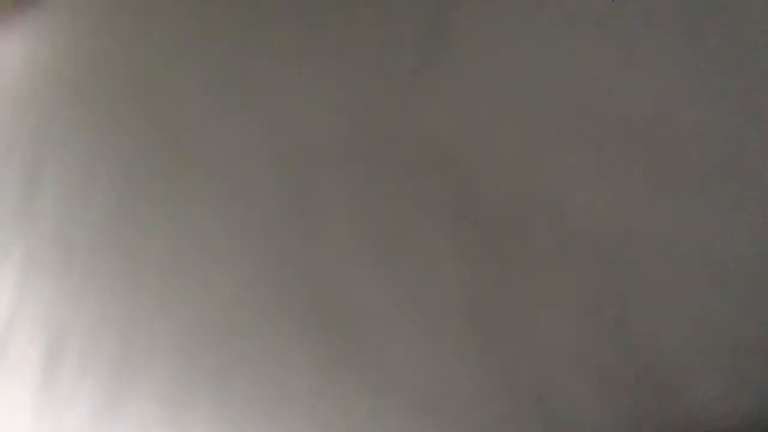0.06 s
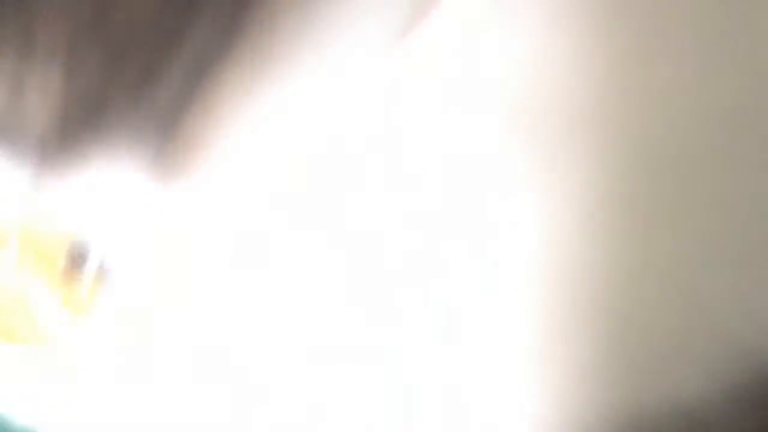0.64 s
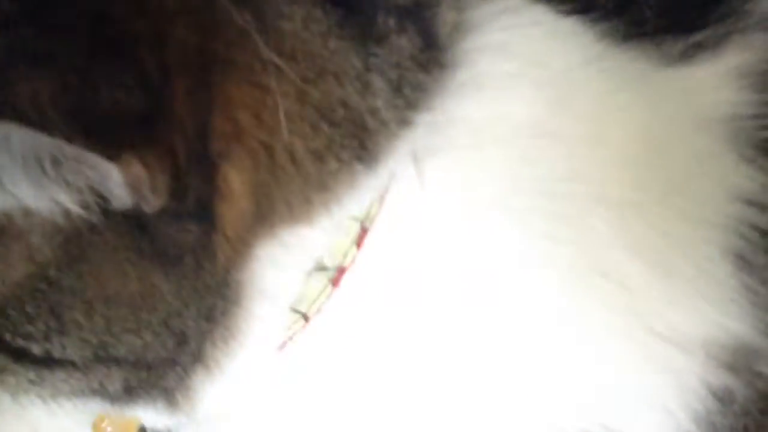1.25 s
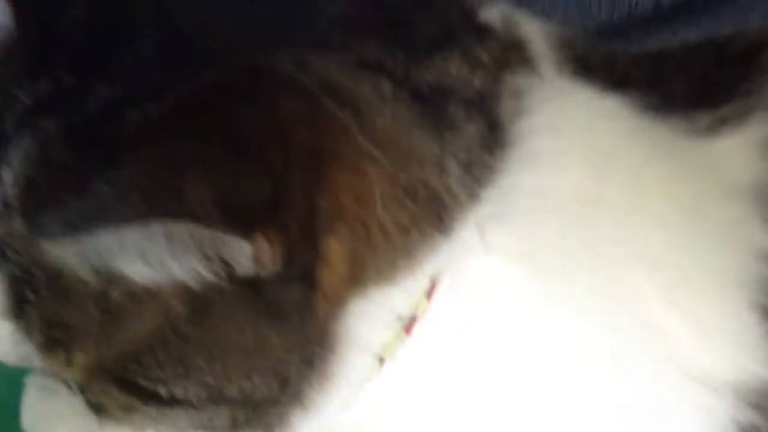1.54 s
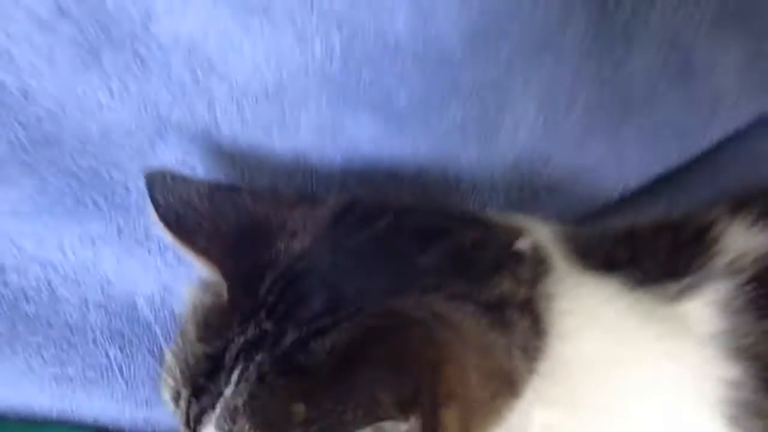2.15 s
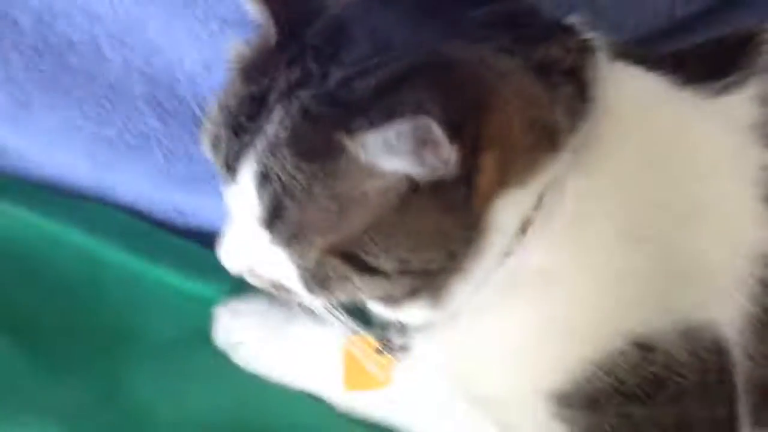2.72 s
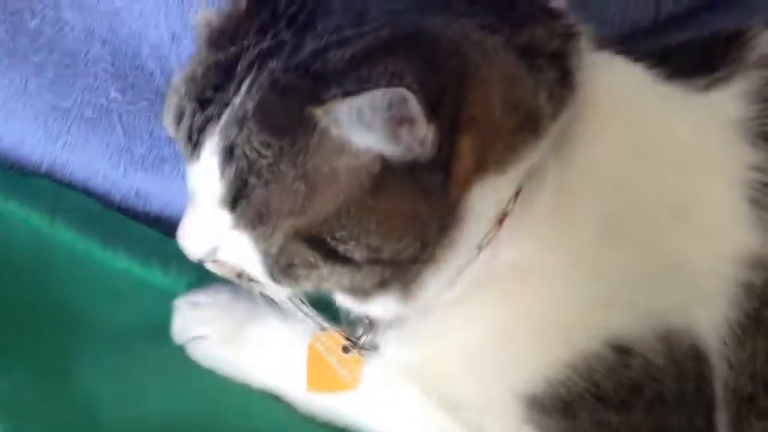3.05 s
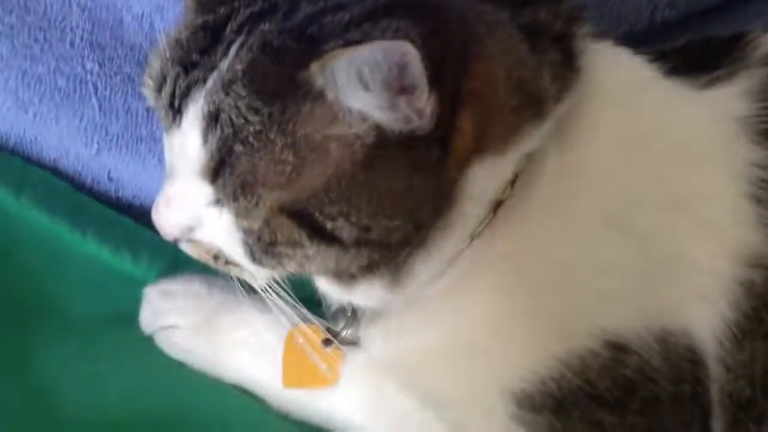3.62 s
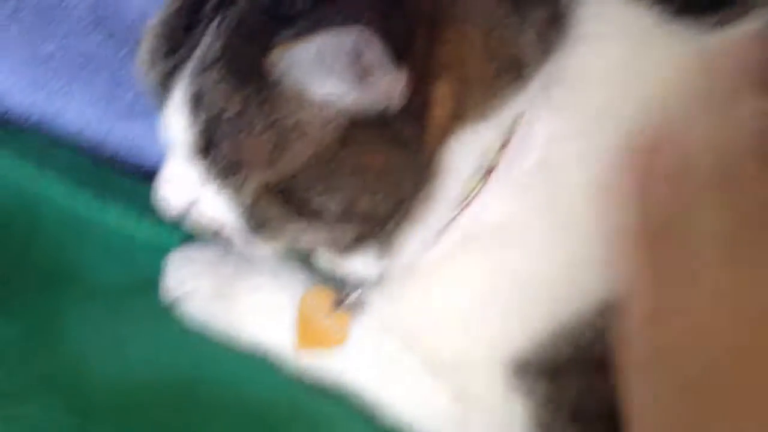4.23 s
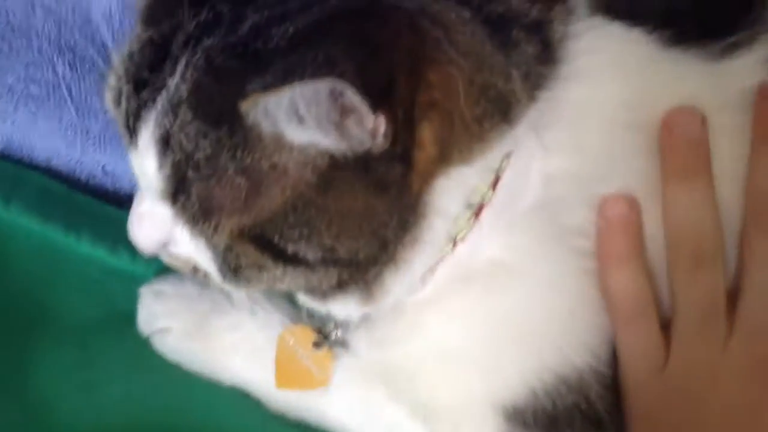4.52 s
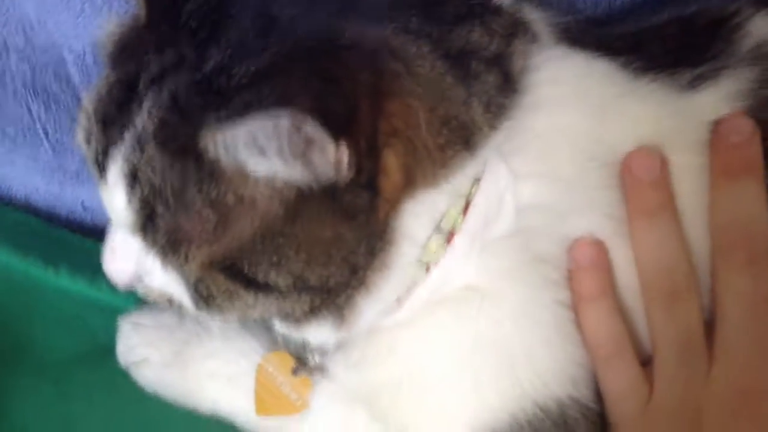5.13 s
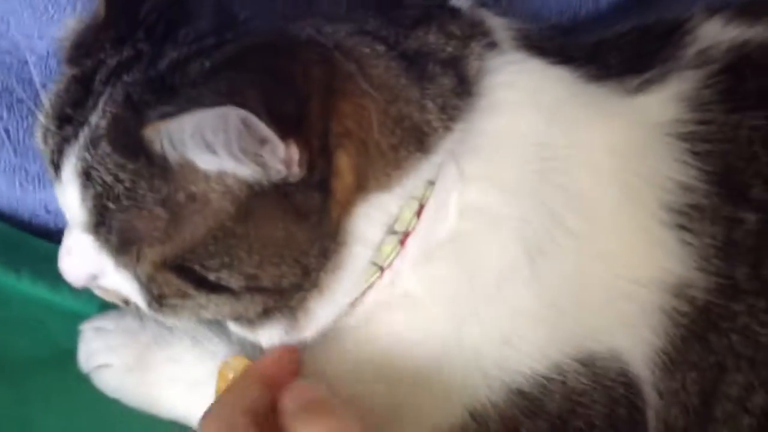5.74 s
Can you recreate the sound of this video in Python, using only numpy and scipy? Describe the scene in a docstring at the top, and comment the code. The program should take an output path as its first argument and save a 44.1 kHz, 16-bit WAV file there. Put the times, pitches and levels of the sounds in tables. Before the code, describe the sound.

Soft fur rustling close to a phone microphone, broken by two loud, crackly scrapes of fingers gripping the phone.

```python
"""A quiet room, a phone held close to a resting cat. Fur and blanket rustle softly as it is drawn back,
with swishes of a hand over fur, a tiny scritch, a muffled thud and a few dry ticks. Twice the grip shifts
and the case scrapes right at the microphone: skin and fur stick and slip, thumping and ringing the phone's
body. The loudest blows overload it. Between the two scrapes the fingers settle with light taps."""
import sys
import numpy as np
from scipy import signal
from scipy.fft import rfft, irfft
from scipy.io import wavfile

SR = 44100
rng = np.random.default_rng(int(sys.argv[2]) if len(sys.argv) > 2 else 0)


def to_wav(s):
    """Save 16-bit WAV."""
    ch = np.atleast_2d(s).T  # columns
    pcm = np.round(np.clip(ch, -1, 1) * 32767)  # PCM
    wavfile.write(sys.argv[1], SR, pcm.astype(np.int16))


N = 254898
BAND_EDGE_HZ = 15500

# room tone: freq_hz, gain_db
ROOM_SPECTRUM = [(24, -62), (40, -38), (136, -5), (240, -3), (620, -11.5), (1730, -14), (5720, -15.5),
                 (15500, -18.5)]
# fur and blanket friction: freq_hz, gain_db
FUR_SPECTRUM = [(50, -38), (120, -9.5), (230, 3), (450, -4), (700, 0.5), (1100, -2.5), (2400, -3.5),
                (4500, -12.5), (7000, -8), (11000, -18), (15500, -18)]
# strokes over fur and blanket: peak_s, rise_s, fall_s, level_db, tilt_db_per_octave
FUR_STROKES = [(.05, 0.89, 1, -56.5, 0.1), (.255, 0.02, 0.047, -51, -6.5), (.51, 0.37, 0.18, -54.5, 0.7),
               (0.985, 0.049, 0.21, -58, -4), (1.42, 0.3, 0.23, -71.5, -7), (1.76, 0.11, 0.16, -60, 0.24),
               (2.242, 0.75, 0.5, -60.5, -0.86), (3.03, 0.099, 0.16, -58, -2.5),
               (3.192, 0.068, 0.018, -56, -2.5), (3.289, 0.15, 0.073, -60, -0.5),
               (3.455, 0.085, 0.045, -53, -1.5)]
# ticks of hair and cloth: start_s, energy_db, pitch_hz
HAIR_TICKS = [(0.543, -26.5, 8400), (1.4715, -39, 12500), (1.4905, -35, 6040), (1.504, -32, 6300),
              (1.515, -32, 6700), (3.013, -38, 7000), (3.447, -37, 9550), (3.463, -34, 7440)]
# resonances of the scritch: start_s, pitch_hz, q, level_db
SCRITCH_MODES = [(.163, 7920, 6.4, -37), (0.1636, 4900, 2.8, -36.5), (0.1667, 2170, 1.66, -28.5),
                 (.169, 11000, 6, -47.5)]
# sliding friction: freq_hz, gain_db
SCRAPE_SPECTRUM = [(60, -28.5), (190, -1.5), (500, 0), (1600, -1), (2600, -2.5), (4000, -6), (6000, -6.5),
                   (10000, -10), (15500, -27)]
# short slides on the case, plus soft swishes of a hand over fur:
# start_s, end_s, level_db, rasp_hz, rasp_height_db, rasp_width_octaves
FRICTION_BURSTS = [(0.381, 0.598, -69, 7050, 14, 0.28), (0.448, 0.606, -57.5, 660, 35, 0.38),
                   (2.482, 2.499, -25.5, 580, 19.5, 0.53), (2.525, 2.546, -33, 2820, 13, 0.42),
                   (2.58, 2.598, -31.5, 794, 19.5, 1), (2.65, 2.665, -30.5, 524, 23, 1),
                   (2.6988, 2.723, -36.5, 5500, 0, 0.68), (3.63, 3.655, -36.5, 8000, -8, 0.97),
                   (3.702, 3.73, -26.5, 405, 33, 0.61), (3.816, 3.86, -32, 697, 39, 0.54),
                   (3.851, 3.869, -29.5, 1390, 10.5, 1), (3.821, 3.864, -30.5, 1670, 19.5, 0.54),
                   (3.877, 3.89, -29.5, 2870, 13, 0.42), (3.897, 3.909, -33, 2640, 6.5, 0.26),
                   (5.518, 5.722, -75.5, 1880, 19, 0.46)]
# long drags of the grip: start_s, rise_s, hold_s, release_s, level_db, hold_loss_db, tilt_db_per_octave
GRIP_DRAGS = [(2.466, 0.0027, 0.047, 0.047, -26, 10, -4.5), (2.534, 0.025, 0.13, 0.07, -33, 6.5, -5.5),
              (2.707, .004, 0.053, 0.1, -41, 7.5, -2), (3.574, 0.051, 0.24, 0.052, -34, 1, -3.5)]
# modes of the case: pitch_hz, t60_s
CASE_MODES = [(800, 0.019), (1050, 0.013), (1380, 0.011), (1800, 0.011), (2200, 0.008), (2700, 0.011),
              (4400, 0.0044)]
# crack of a releasing catch: freq_hz, gain_db
CRACK_SPECTRUM = [(300, -16), (1200, -4.5), (2900, -1), (5600, -4), (8000, -8), (11500, -8), (16000, -23)]
# catches of the grip: start_s, strength_db, hardness_db (soft pad < 0 < sharp edge), thump_hz, ring_hz
GRIP_CATCHES = [(2.4684, 0, 4, 420, 720), (2.4696, -4, -3, 330, 2600), (2.4725, -10.5, -13.5, 253, 1700),
                (2.4784, -15, -11, 172, 870), (2.481, -22.5, 9, 300, 3550), (2.504, -18, -1, 396, 950),
                (2.5597, -22, -7.5, 510, 1400), (2.564, -10.5, -2.5, 620, 900),
                (2.5958, -6.5, -7, 440, 1000), (2.5996, -11.5, 2.5, 372, 1000), (2.624, -14, 1, 286, 1500),
                (2.6434, -15, 4.5, 340, 1850), (2.6787, -22, -9.5, 313, 1240), (2.682, -14, 5, 600, 1440),
                (2.7006, -12.5, -6, 476, 1380), (2.7279, -28, 17.5, 516, 2650), (2.811, -47, -12, 235, 885),
                (2.870, -52.5, -12, 324, 1137), (3.0402, -40, 4, 500, 2700), (3.0892, -27, 0.5, 480, 1110),
                (3.138, -16, -3.5, 377, 1900), (3.331, -33.5, 1, 450, 1530), (3.412, -38.5, -2, 308, 1000),
                (3.4368, -34.5, -14, 470, 775), (3.649, -27, 7.5, 423, 2400), (3.6626, -18, 2, 326, 1140),
                (3.671, -1, 0.5, 366, 1250), (3.676, -17, -12, 490, 1170), (3.6816, -8.5, 7.5, 330, 1210),
                (3.6816, -16, -12, 330, 800), (3.716, -17, -4, 402, 1290),
                (3.7218, -16.5, -11.5, 244, 1380), (3.727, -14, 5.5, 340, 1420),
                (3.7306, -22, 8.5, 400, 1900), (3.745, -10.5, 1, 355, 990), (3.752, -17, -2.5, 336, 1840),
                (3.827, -16.5, 4.5, 600, 1350), (3.8735, -19, 5.5, 634, 1720),
                (3.897, -19.5, 9.5, 645, 2600)]
# resonance of the microphone's sound hole: time_s, pitch_hz
PORT_PITCH = [(2.56, 5260), (2.661, 5565), (3.7, 5450), (3.87, 5700)]


def amp(db):
    """Decibels to gain."""
    return 10 ** (np.asarray(db) / 20)


def unit_rms(x):
    """Scales to rms 1."""
    return x / np.sqrt(np.mean(x ** 2) + 1e-20)


def spectrum_db(spectrum, hz):
    """Interpolates a spectrum over log frequency."""
    freq_hz, gain_db = np.transpose(spectrum)
    return np.interp(np.log(hz + 1), np.log(freq_hz + 1), gain_db)


def add(mix, start_s, sound):
    """Mixes a sound in at start_s."""
    part = mix[max(round(start_s * SR), 0):][:len(sound)]
    part += sound[:len(part)]


def coloured(x, spectrum):
    """Filters x by a spectrum."""
    hz = np.fft.rfftfreq(len(x), 1 / SR)
    return irfft(rfft(x) * amp(spectrum_db(spectrum, hz)), len(x))


def wander(size, cutoff_hz):
    """Slow random drift, rms 1."""
    hz = np.fft.rfftfreq(size, 1 / SR)
    return unit_rms(irfft(rfft(rng.standard_normal(size)) * np.exp(-(hz / cutoff_hz) ** 2), size))


def friction(size, grain_db, clump_db, clump_hz):
    """Countless tiny catches of hair and skin, uneven in size, arriving in clumps."""
    grains = rng.standard_normal(size) * amp(grain_db * np.minimum(rng.exponential(1, size), 5))
    return unit_rms(grains * amp(clump_db * wander(size, clump_hz)))


def rub(drive, spectrum, times_s, level_db, tilt_db_per_octave):
    """Friction along level and tilt curves: pressing is dark, quick light sliding is bright."""
    hz, frames_s, bins = signal.stft(drive, SR, nperseg=512, noverlap=384)
    colour = unit_rms(amp(spectrum_db(spectrum, hz)))[:, None]
    octaves = np.log2(np.clip(hz, 250, 9000) / 1500)[:, None]
    tilt = amp(octaves * np.interp(frames_s, times_s, tilt_db_per_octave))
    sound = signal.istft(bins * colour * tilt, SR, nperseg=512, noverlap=384)[1][:N]
    return sound * amp(np.interp(np.arange(N) / SR, times_s, level_db, left=-140, right=-140))


def room_tone(level_db=-65.5):
    """Steady low noise of the room."""
    return amp(level_db) * unit_rms(coloured(rng.standard_normal(N), ROOM_SPECTRUM))


def room_tail(x, t60_s=0.032):
    """Short, dull reverberation of a furnished room."""
    t = np.arange(16384) / SR
    tail = rng.standard_normal(len(t)) * amp(-60 * t / t60_s) * (t > 0.003)
    tail = coloured(tail, [(2500, 1.0), (12000, -13.5)])
    return signal.fftconvolve(x, tail / np.linalg.norm(tail))[:N]


def fur_rustle(fade_db=16.5, roundness=1.1):
    """Fur and blanket: fine friction that swells and fades with each stroke."""
    times_s = np.arange(0, N, 256) / SR
    peak_s, rise_s, fall_s, level_db, tilt_db_per_octave = np.transpose(FUR_STROKES)[:, :, None]
    from_peak = np.maximum((peak_s - times_s) / rise_s, (times_s - peak_s) / fall_s)
    power = amp(level_db - fade_db * from_peak ** roundness) ** 2 + 1e-14  # roundness: 1 pointed, 2 bell
    total_power = power.sum(0)
    mean_tilt = (power * tilt_db_per_octave).sum(0) / total_power
    drive = friction(N, grain_db=3.5, clump_db=1.72, clump_hz=60)
    return rub(drive, FUR_SPECTRUM, times_s, 10 * np.log10(total_power), mean_tilt)


def hair_ticks(t60_s=0.0097, q=5.1):
    """Hair and cloth tick: abrupt noise bursts, each around one high pitch."""
    out, t = np.zeros(N), np.arange(2048) / SR
    for start_s, energy_db, pitch_hz in HAIR_TICKS:
        burst = rng.standard_normal(len(t)) * amp(-60 * t / t60_s)
        tick = signal.lfilter(*signal.iirpeak(pitch_hz, q, fs=SR), burst)
        add(out, start_s, amp(energy_db) * tick / np.linalg.norm(tick))
    return out


def scritch(end_s=0.1721, ramp_s=0.00062, wet_db=-21):
    """A scritch a little way off, perhaps the collar: resonances catch in turn and stop together."""
    out, t = np.zeros(N), np.arange(N) / SR
    for start_s, pitch_hz, q, level_db in SCRITCH_MODES:
        band = signal.iirpeak(pitch_hz, q, fs=SR)
        ring = unit_rms(signal.lfilter(*band, signal.lfilter(*band, rng.standard_normal(N))))
        out += amp(level_db) * ring * np.clip((t - start_s) / ramp_s, 0, 1)
    out *= np.exp(-np.maximum(t - end_s, 0) / ramp_s)
    return out + amp(wet_db) * room_tail(out, t60_s=0.037)


def bedding_thud(start_s=0.2265, level_db=-34, rise_s=0.002, t60_s=0.16):
    """A muffled shove against the bedding."""
    out, t = np.zeros(N), np.arange(16384) / SR
    spectrum = [(90, -46), (230, 7.0), (370, -5.5), (520, -9.0), (1400, -12.5), (2600, -33), (8000, -53)]
    body = unit_rms(coloured(rng.standard_normal(len(t)), spectrum))
    envelope = (1 - np.exp(-t / rise_s)) * amp(-60 * t / t60_s)
    add(out, start_s, amp(level_db) * body * envelope)
    return out


def friction_bursts(ramp_share=0.28, tilt_db_per_octave=0.66, low_cut_db_per_octave=5):
    """Slides on the case and hand swishes over fur: friction with one broad band, thinned far below it."""
    out, t = np.zeros(N), np.arange(16384) / SR
    hz = np.fft.rfftfreq(len(t), 1 / SR) + 1
    colour_db = spectrum_db(SCRAPE_SPECTRUM, hz) + tilt_db_per_octave * np.log2(hz)
    for start_s, end_s, level_db, rasp_hz, height_db, width_octaves in FRICTION_BURSTS:
        rasp_db = height_db * np.exp(-0.5 * (np.log2(hz / rasp_hz) / width_octaves) ** 2)
        low_cut_db = low_cut_db_per_octave * np.maximum(np.log2(rasp_hz / hz) - 2, 0)
        drive = friction(len(t), grain_db=3.5, clump_db=1.45, clump_hz=420)
        sound = unit_rms(irfft(rfft(drive) * amp(colour_db + rasp_db - low_cut_db)))
        ramp_s = ramp_share * (end_s - start_s)  # long bursts swell, short ones snap
        envelope = np.clip(np.minimum(t, end_s - start_s + ramp_s - t) / ramp_s, 0, 1)
        add(out, start_s - ramp_s / 2, amp(level_db) * sound * envelope)
    return out


def grip_drags(light_drop_db=29.5, light_tilt_db_per_octave=1.7):
    """The case drags under the grip: a dense rub that presses in, slackens and lets go."""
    out = np.zeros(N)
    drive = friction(N, grain_db=2.5, clump_db=4.0, clump_hz=170)
    light_touch, slackened = np.array([1, 0, 0, 1]), np.array([0, 0, 1, 1])  # per envelope corner
    for start_s, rise_s, hold_s, release_s, level_db, hold_loss_db, tilt_db_per_octave in GRIP_DRAGS:
        corners_s = start_s + np.cumsum([0, rise_s, hold_s, release_s])
        envelope_db = level_db - light_drop_db * light_touch - hold_loss_db * slackened
        tilt = tilt_db_per_octave + light_tilt_db_per_octave * light_touch
        out += rub(drive, SCRAPE_SPECTRUM, corners_s, envelope_db, tilt)
    return out


def thump(t, centre_hz, t60_s=0.013, sag_share=0.4, sag_s=0.0016, rise_s=0.00084):
    """A damped push of air into the sound hole; the pitch sags as the finger closes on it."""
    pitch_hz = centre_hz * (1 + sag_share * (np.exp(-t / sag_s) - 0.5))
    envelope = (1 - np.exp(-t / rise_s)) * amp(-60 * t / t60_s)
    return np.sin(2 * np.pi * np.cumsum(pitch_hz) / SR) * envelope


def case_ring(t, centre_hz, falloff_db_per_octave=11.0, detune_share=0.084, rise_s=0.0001):
    """Hand-damped modes of the case; the spot hit favours those near centre_hz."""
    mode_hz, t60_s = np.transpose(CASE_MODES)[:, :, None]
    shift, half_turns = rng.uniform(-0.91, 1, (2, len(CASE_MODES), 1))
    detuned_hz = mode_hz * (1 + detune_share * shift)
    envelope_db = -falloff_db_per_octave * abs(np.log2(mode_hz / centre_hz)) - 60 * t / t60_s
    modes = amp(envelope_db) * np.sin(2 * np.pi * detuned_hz * t + np.pi * half_turns)
    ring = modes.sum(0) * (1 - np.exp(-t / rise_s))
    return ring / np.linalg.norm(ring)


def crack(t, hardness_db, t60_s=0.0042, snap=1.2, neutral_cutoff_hz=5200, hardness_db_per_octave=7):
    """A catch releases: one sharp snap, then brief crumbling; a soft pad muffles the top."""
    burst = rng.standard_normal(len(t)) * amp(-60 * t / t60_s)
    burst[0] += snap
    sound = coloured(np.roll(burst, 16), CRACK_SPECTRUM)  # delay leaves room for filter pre-ring
    cutoff_hz = min(neutral_cutoff_hz * 2 ** (hardness_db / hardness_db_per_octave), BAND_EDGE_HZ)
    return signal.lfilter(*signal.butter(2, cutoff_hz, fs=SR), sound / np.linalg.norm(sound))


def grip_catches(thump_db=4, ring_db=11.5, crack_db=-1.5, crack_db_per_hardness_db=1.34):
    """Each catch thumps the sound hole, rings the case and cracks; harder ones trade thump for crack."""
    out, t = np.zeros(N), np.arange(4096) / SR
    for start_s, strength_db, hardness_db, thump_hz, ring_hz in GRIP_CATCHES:
        push = amp(thump_db - hardness_db) * thump(t, thump_hz)
        ring = amp(ring_db) * case_ring(t, ring_hz)
        snap = amp(crack_db + crack_db_per_hardness_db * hardness_db) * crack(t, hardness_db)
        add(out, start_s, amp(strength_db) * (push + ring + snap))
    return out


def port_resonance(x, width_hz=500, gain=0.96, phase_rad=0.96):
    """Adds the ring of the microphone's sound hole, tuned by the covering finger."""
    pitch_hz = np.interp(np.arange(N) / SR, *np.transpose(PORT_PITCH))
    carrier = np.exp(2j * np.pi * np.cumsum(pitch_hz) / SR)
    pole = np.exp(-np.pi * width_hz / SR)
    ring = carrier * signal.lfilter([1 - pole], [1, -pole], x / carrier)
    return x + 2 * gain * (np.exp(1j * phase_rad) * ring).real  # phase leaves a dip just below the ring


def scene(wet_db=-34.5):
    """Contact sounds at the microphone over soft rustling and room tone."""
    contact = port_resonance(grip_catches() + grip_drags() + friction_bursts())
    mix = room_tone() + contact + amp(wet_db) * room_tail(contact)
    mix += fur_rustle() + hair_ticks() + scritch() + bedding_thud()
    return mix[None]


def record(dry, low_cut_hz=135, bass_leak_db=-29, asymmetry=0.046):
    """The phone cuts the bass, flattens the biggest peaks a little unevenly and limits the band."""
    high_pass = signal.butter(3, low_cut_hz, "high", fs=SR, output="sos")
    thin = signal.sosfilt(high_pass, dry) + amp(bass_leak_db) * dry
    clipped = thin / (1 + thin ** 6) ** (1 / 6)  # soft clip at full scale
    lopsided = clipped + asymmetry * clipped ** 2
    low_pass = signal.firwin(301, BAND_EDGE_HZ, window=("kaiser", 8), fs=SR)
    return signal.oaconvolve(lopsided, low_pass[None], "same")


dry = scene()
out = record(dry)
to_wav(out)
```